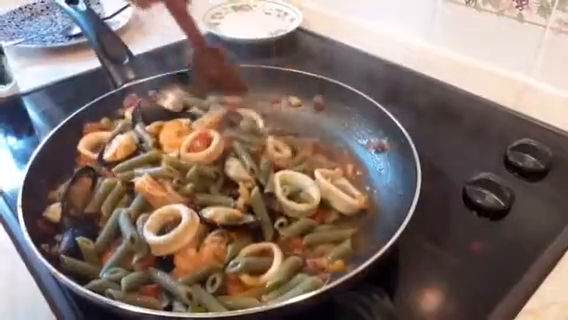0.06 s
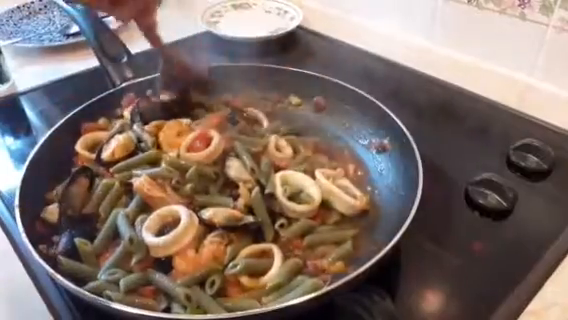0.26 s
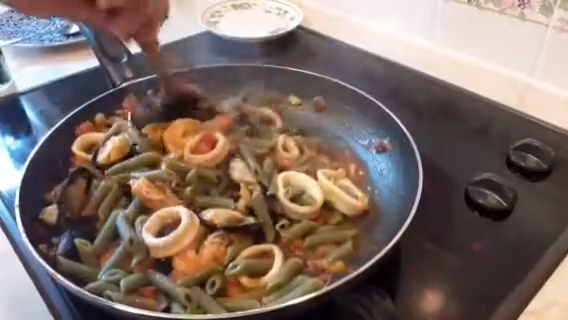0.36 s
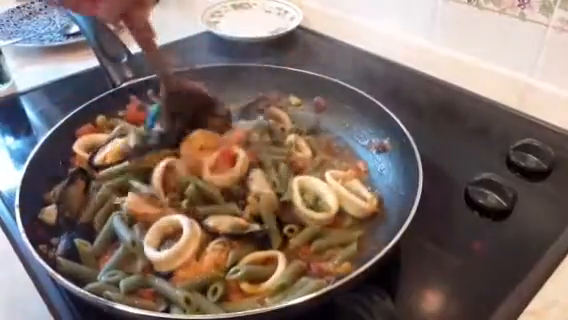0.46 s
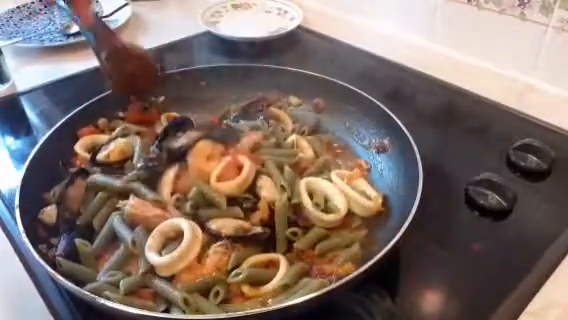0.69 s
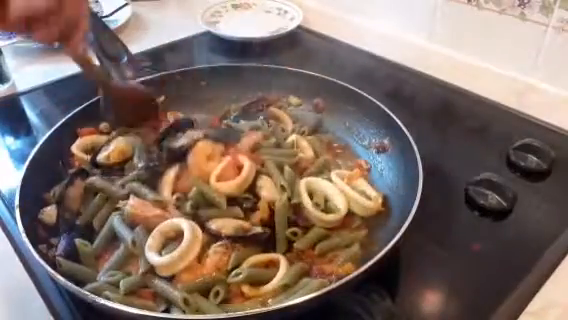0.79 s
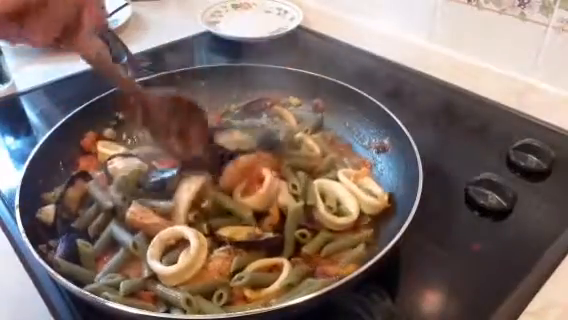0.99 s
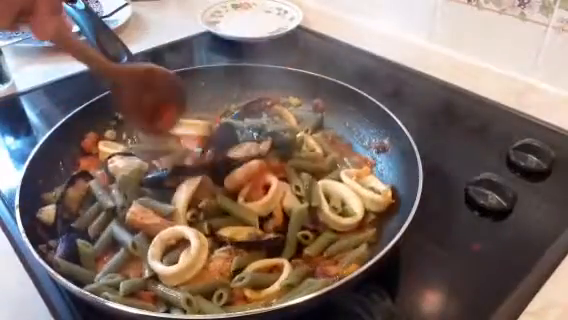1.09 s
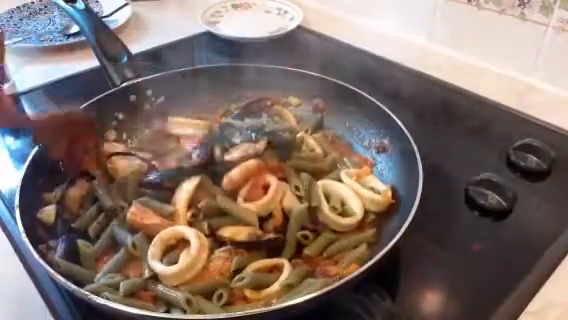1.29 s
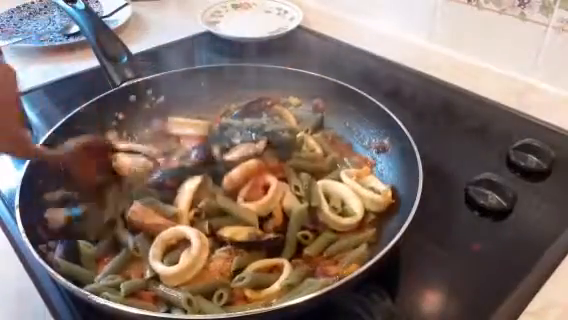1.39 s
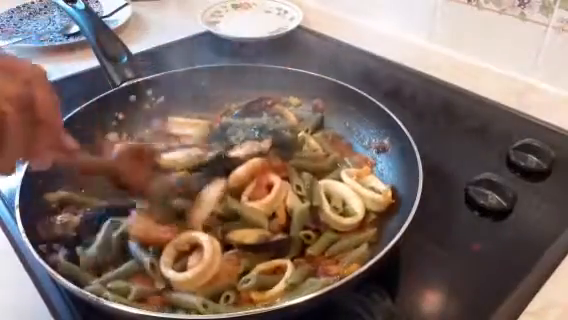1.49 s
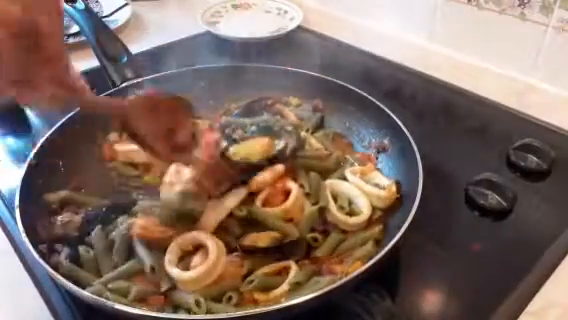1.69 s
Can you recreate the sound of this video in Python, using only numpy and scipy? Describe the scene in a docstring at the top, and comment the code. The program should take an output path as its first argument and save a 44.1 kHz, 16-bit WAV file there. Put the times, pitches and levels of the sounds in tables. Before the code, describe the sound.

A wooden spatula knocks a frying pan three times while dragging through pasta and seafood. The pan rings briefly and rattles on the glass hob, shells click and food sizzles softly, close up in a tiled kitchen.

```python
"""A tiled kitchen, a small stereo camera close to a frying pan full of food on a glass hob.
From the start, food slides and sizzles softly over a faint mains hum. At 0.2 s a wooden spatula knocks
the pan: it rings and chatters on the hob, the tiles answer, and the spatula drags on through the food.
Shells click from 0.5 s on, a second knock lands at 0.74 s, and the oil spits once at 0.95 s.
The third knock comes at 1.3 s, followed by more dragging and the last clicks."""
import sys
import numpy as np
from scipy import signal
from scipy.fft import rfft, irfft
from scipy.io import wavfile
from scipy.ndimage import uniform_filter1d

SR = 44100
rng = np.random.default_rng(int(sys.argv[2]) if len(sys.argv) > 2 else 0)


def to_wav(sig):
    """Store sig (one row per channel, or 1-D mono) as 16-bit WAV at the path in sys.argv[1].

    Samples outside -1..1 are clipped; the rate is SR.
    """
    pcm = np.clip(np.atleast_2d(sig), -1, 1) * 32767
    pcm = np.round(pcm).astype(np.int16)
    wavfile.write(sys.argv[1], SR, pcm.T)  # frames by channels


N = 77175

# Nine bands that colour the knocks and the room (centre [Hz])
BANDS_HZ = (140, 330, 500, 720, 1150, 2400, 4200, 6800, 12500)
# Reverberation of the kitchen (frequency [Hz], t60 [s])
ROOM_T60 = [(150, 0.51), (1500, 0.28), (14000, 0.34)]
# Scattered sound common to both microphones (frequency [Hz], share of power [0-1])
COMMON_SHARE = [(60, 0.77), (1500, 0.29), (8000, 0.067), (14000, 0.024)]
# Sensitivity of the microphones (frequency [Hz], left minus right [dB])
MIC_BALANCE = [(100, -5.5), (1000, -2.5), (6000, -4), (13000, 0)]
# Spectrum of the sizzle (frequency [Hz], relative level [dB])
SIZZLE_TONE = [(82, -50), (140, -55), (445, -13), (481, -39), (1230, -31), (3600, -25.5), (15100, 4),
               (16400, -22)]
# Spatula and food sliding over the pan (time [s], level [dB])
SLIDE_LEVEL = [(0, -49), (0.188, -50), (0.3, -44), (0.5, -47), (0.62, -53), (0.74, -51), (0.8, -46),
               (1.03, -46), (1.272, -53.5), (1.33, -44), (1.5, -46), (1.63, -53), (1.75, -50)]
# Spectrum of the sliding (frequency [Hz], relative level [dB])
SLIDE_TONE = [(120, -1.5), (200, -18.5), (329, -10.5), (620, -9), (1950, -9.5), (9000, -19), (12000, -24.5),
              (15600, -33.5), (22000, -120)]
# Shells clicking together in the food (time [s], level [dB], first mode [Hz], second mode [Hz])
SHELL_CLICKS = [(0.514, -41, 2000, 2410), (0.9113, -33, 2154, 1510), (0.951, -35, 1580, 1034),
                (1.4115, -26.5, 2224, 2010), (1.667, -39.5, 2213, 3040)]
# Modes of the pan, one table each (pitch [Hz]), (relative level [dB]), (t60 [s])
PAN_HZ = (116, 165, 220, 280, 305, 358, 455, 716, 872, 1075, 1165, 1384, 2155, 2484, 2545, 2890, 3365, 4177,
          5870, 6570, 7290, 8150)
PAN_DB = (-2, -3.5, -5.5, -14.5, -1.5, 2, -8.5, 4, 1.5, -7, 0.5, 2, 12.5, 8.5, 1, -8, -5, -10, 8, -1, -22,
          -11.5)
PAN_T60_S = (0.25, 0.17, 0.1, 0.091, 0.13, 0.14, 0.27, 0.088, 0.1, 0.16, 0.089, 0.045, 0.026, 0.072, 0.049,
             0.18, 0.11, 0.14, 0.012, 0.032, 0.041, 0.09)
# Decay of the dull crack of wood and food (frequency [Hz], t60 [s])
CRACK_T60 = [(140, 0.097), (700, 0.12), (2400, 0.15), (7000, 0.08)]
# Thuds of the pan rocking on the hob (time [s], relative levels at 330, 140 and 720 Hz [dB])
ROCKS = [(0.289, -22.5, -40, -67), (0.307, -29.5, -44, -54), (0.332, -47, -65, -64),
         (0.412, -40.5, -63, -44.5), (0.433, -59, -45, -55), (0.768, -25, -42.5, -41),
         (0.78, -26.5, -68, -39), (0.83, -29.5, -84, -47), (0.8462, -34, -53, -53),
         (1.323, -37.5, -45, -39), (1.343, -31, -34.5, -49), (1.387, -42.5, -52, -57),
         (1.4132, -33, -47.5, -66), (1.4551, -40, -55.5, -53)]
# Spatula blows (time [s], tick gain [dB], ring gain [dB], nine relative band levels, low to high [dB])
BLOWS = [(0.2044, -9.5, 0, -49, -41.5, -47, -38.5, -29, -28, -26.5, -14.5, -35.5),
         (0.2626, -43, -3.5, -38.5, -22, -29.5, -27.5, -24.5, -35.5, -49, -45, -60),
         (0.277, -38, 0.5, -31, -58, -50, -39, -60, -38.5, -42, -48, -63),
         (0.742, -11, 1.5, -45, -24, -26, -32.5, -28.5, -30, -34.5, -34.5, -35),
         (0.756, -49, 3, -41, -42, -32, -45, -28, -67, -41, -69, -57),
         (1.298, -9.5, 5, -40, -41.5, -57, -34.5, -36, -33.5, -39, -35, -70),
         (1.313, -42, 0.5, -54, -28.5, -36, -35, -92, -34.5, -35, -60, -60),
         (1.411, -61, -12, -69, -46, -42, -33.5, -27.5, -40, -63, -49, -62)]

RISE_S = .00061  # attack of a hard contact
TIME_S, BIN_HZ = np.arange(N) / SR, np.arange(N // 2 + 1) * SR / N


def undb(db):
    return 10 ** (np.asarray(db) / 20)


def level(x, db):
    return x * undb(db) / np.sqrt(np.mean(x ** 2))


def at(table, hz):
    """Read a (frequency [Hz], value) table on a log axis."""
    table = np.array(table, float)
    return np.interp(np.log(np.maximum(hz, 1)), np.log(table[:, 0]), table[:, 1])


def fade(t, t60):
    return np.exp(-np.log(1000) * t / t60)


def smooth(x, size):
    return uniform_filter1d(uniform_filter1d(x, size), size)


def wander(rate_hz):
    """Slow random drift with a spread near 1."""
    step = int(SR / rate_hz)
    return np.sqrt(2) * smooth(np.repeat(rng.standard_normal(N // step + 1), step), step)[:N]


def noise_bands(size):
    """Noise split into smooth bands at BANDS_HZ, each of rms 1."""
    hz = np.arange(size // 2 + 1) * SR / size + 1
    spectrum = rfft(rng.standard_normal(size)) / (1 + (100 / hz) ** 4)  # low cut at 100 Hz
    shapes = [np.interp(np.log(hz), np.log(BANDS_HZ), row) for row in np.eye(len(BANDS_HZ))]
    parts = irfft(spectrum * shapes, size)
    return parts / parts.std(axis=1, keepdims=True)


def mic_pair(x, lag_s=.0002604):
    """Direct sound reaches the left microphone first."""
    return np.array([x, irfft(rfft(x) * np.exp(-2j * np.pi * BIN_HZ * lag_s), N)])


def diffuse(common, left, right, tone):
    """Scattered sound: three coloured noises, one of them heard by both microphones."""
    share = at(COMMON_SHARE, BIN_HZ)
    gain = undb(at(tone, BIN_HZ)) / (1 + (100 / (BIN_HZ + 1)) ** 4)  # low cut at 100 Hz
    shared = mic_pair(irfft(rfft(common) * gain * np.sqrt(share), N))
    return shared + irfft(rfft([left, right]) * gain * np.sqrt(1 - share), N)


def mains_hum(hz=49.2, db=-60.5):
    """Faint mains hum, wavering in level and phase."""
    amplitude = np.sqrt(2) * undb(db + 3 * wander(5.4))
    return amplitude * np.sin(2 * np.pi * hz * TIME_S + .13 * wander(9.4))


def drone(hz=102, width_hz=9.6, db=-71.5):
    """A narrow band of noise, heard as a low throb."""
    band = np.exp(-((BIN_HZ - hz) / width_hz) ** 2)
    return level(irfft(rfft(rng.standard_normal(N)) * band, N), db)


def tiled_room(x, db=-7, rise_s=.004, size=32768):
    """The tiled walls return a decaying noise tail, a different one to each microphone."""
    t = np.arange(size) / SR
    t60 = at(ROOM_T60, BANDS_HZ)[:, None]
    weight = np.sqrt(np.array(BANDS_HZ)[:, None] / t60)
    envelope = weight * fade(t, t60) * np.clip(t / rise_s, 0, 1)
    tails = [(noise_bands(size) * envelope).sum(axis=0) for _ in range(2)]
    return np.array([signal.fftconvolve(x, undb(db) * h / np.linalg.norm(h))[:N] for h in tails])


def sizzle(db=-65.5):
    """Soft sizzle and room air: a bright hiss that flickers a little."""
    hiss = diffuse(*rng.standard_normal((3, N)), SIZZLE_TONE)
    return level(hiss, db) * undb(.4 * wander(6))


def rubbing_grains(per_s=2000, spread_db=3):
    """Tiny random contacts, each briefly swelling a noise."""
    hits = (rng.random(N) < per_s / SR) * undb(spread_db * rng.exponential(size=N))
    density = np.abs(uniform_filter1d(hits, size=60)) * SR / per_s
    return rng.standard_normal(N) * (1 + np.sqrt(density))


def slide():
    """Food and wood rub over the pan in dense small grains, near and scattered."""
    pair = diffuse(rubbing_grains(), rubbing_grains(), rubbing_grains(), SLIDE_TONE)
    times, db = np.array(SLIDE_LEVEL).T
    return level(pair, 0) * undb(np.interp(TIME_S, times, db) + .6 * wander(15))


def oil_spit(start_s=.951, db=-32.5, t60_s=.054, size=4096):
    """One spit of oil: a short burst of very bright noise."""
    out, i = np.zeros(N), int(start_s * SR)
    highpass = signal.butter(6, 11800, "high", fs=SR, output="sos")
    burst = signal.sosfilt(highpass, rng.standard_normal(size))
    out[i:i + size] = undb(db) * burst * fade(np.arange(size) / SR, t60_s)
    return out


def shell_clicks(t60_s=.05, roughness=3, second_mode_db=-4, size=4096):
    """Shells knock together, each click ringing two short rough modes."""
    out, t = np.zeros(N + size), np.arange(size) / SR
    envelope = np.clip(t / RISE_S, 0, 1) * fade(t, t60_s)
    for start_s, db, *hz in SHELL_CLICKS:
        rough = 1 + roughness * smooth(rng.standard_normal((2, size)), 40)
        modes = rough * np.sin(2 * np.pi * np.outer(hz, t))
        i = int(start_s * SR)
        out[i:i + size] += undb(db) * envelope * (undb([0, second_mode_db]) @ modes)
    return out[:N]


def pan_contact(start_s, tick_db, ring_db, band_db, rise_s, size=16384):
    """One contact: ringing pan modes and a noisy crack, both coloured by band_db, plus a tick."""
    out, t = np.zeros(N + size), np.arange(size) / SR
    hz, t60 = np.array([PAN_HZ, PAN_T60_S], float)
    modes = np.sin(2 * np.pi * hz[:, None] * t) * fade(t, t60[:, None])
    mode_db = ring_db + np.array(PAN_DB) + at(list(zip(BANDS_HZ, band_db)), hz)
    ring = undb(mode_db) @ modes
    crack_bands = noise_bands(size) * fade(t, at(CRACK_T60, BANDS_HZ)[:, None])
    crack = undb(np.array(band_db) - 5) @ crack_bands
    tick = undb(tick_db - 9.5) * np.sin(2 * np.pi * 5850 * t) * fade(np.abs(t - RISE_S), t60=.005)
    attack = np.clip(t / rise_s, 0, 1) ** 2
    i = int(start_s * SR)
    out[i:i + size] = attack * (ring + crack + tick)
    return out[:N]


def pan_rocking(dip_db=-3.5, per_band_db=-2.5):
    """After a blow the pan chatters on the glass hob in soft, dull thuds with no tick."""
    out = np.zeros(N)
    for start_s, low, deep, mid in ROCKS:
        upper_bands = mid + per_band_db * np.arange(6)
        band_db = [deep, low, (low + mid) / 2 + dip_db, *upper_bands]
        out += pan_contact(start_s, tick_db=-np.inf, ring_db=2, band_db=band_db, rise_s=.0051)
    return out


def spatula_blows():
    """Close to the microphones, wood strikes the pan sharply, each blow in its own colour."""
    return sum(pan_contact(start_s, tick_db, ring_db, band_db, RISE_S)
               for start_s, tick_db, ring_db, *band_db in BLOWS)


def scene():
    """The pan close by and to the left, shells and oil nearer the middle, the kitchen around them."""
    low_cut = signal.butter(4, 95, "high", fs=SR, output="sos")
    pan = signal.sosfilt(low_cut, spatula_blows() + pan_rocking())
    food = shell_clicks() + oil_spit()
    direct = mic_pair(pan) + mic_pair(food, lag_s=.0001)
    return direct + tiled_room(pan + food) + slide() + sizzle() + mic_pair(mains_hum() + drone())


def record(dry):
    """The right microphone is the more sensitive; the camera cuts the top above 16.1 kHz."""
    half_db = at(MIC_BALANCE, BIN_HZ) / 2
    picked_up = irfft(rfft(dry) * undb([half_db, -half_db]), N)
    return signal.sosfilt(signal.ellip(8, .2, 70, 16100, fs=SR, output="sos"), picked_up)


dry = scene()
out = record(dry)
to_wav(out)
```